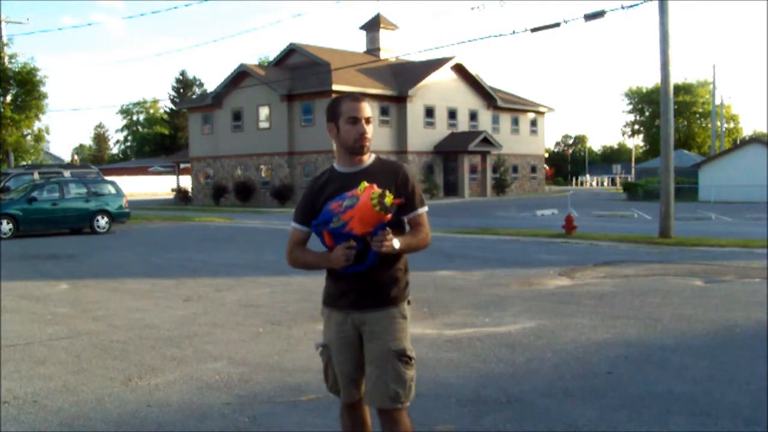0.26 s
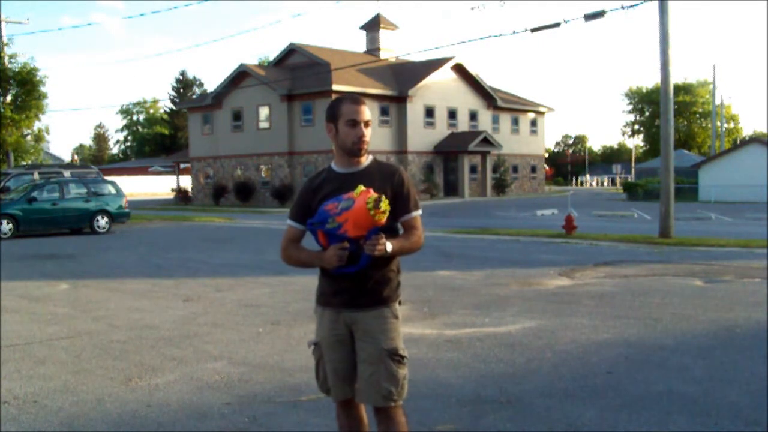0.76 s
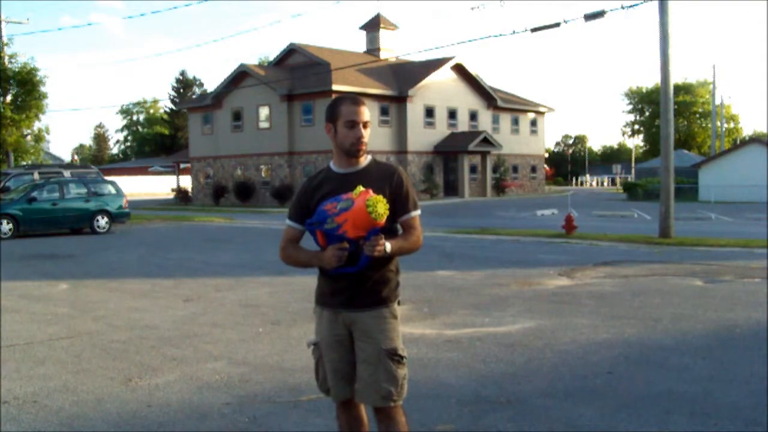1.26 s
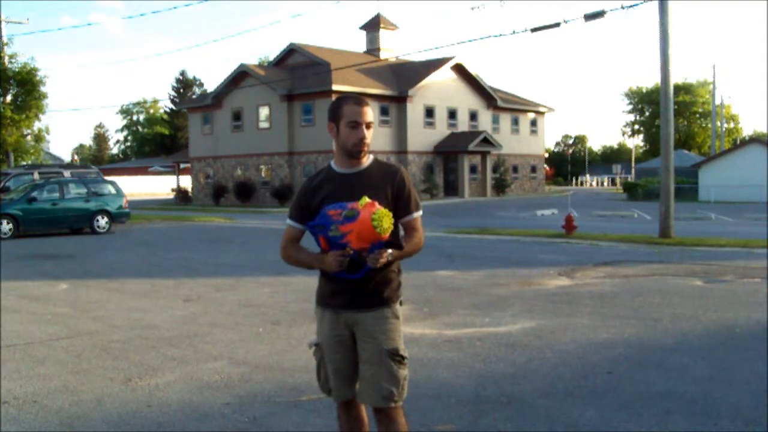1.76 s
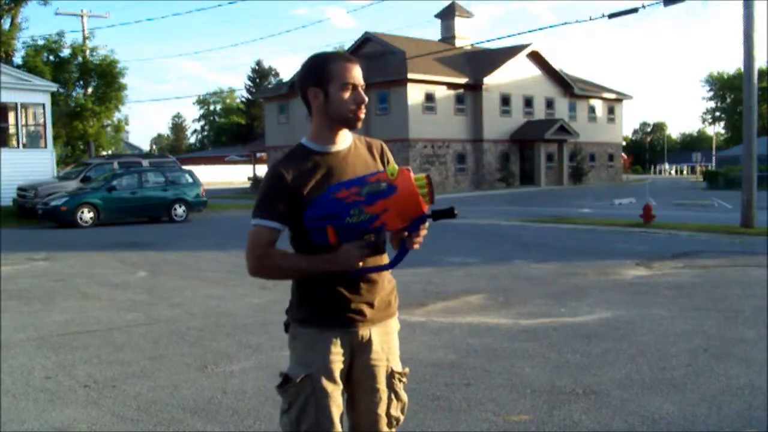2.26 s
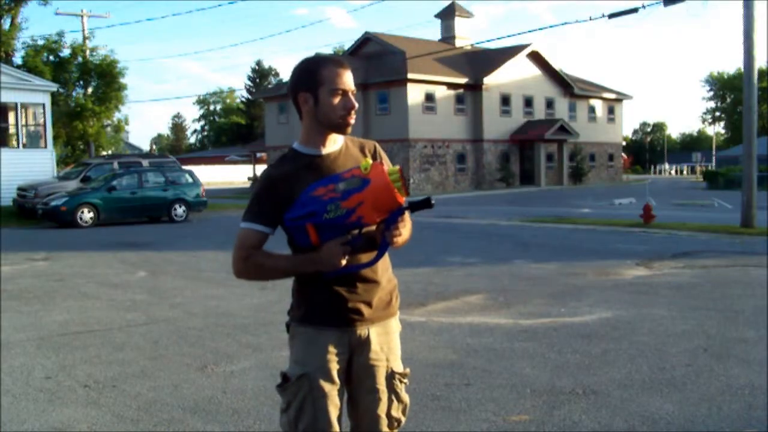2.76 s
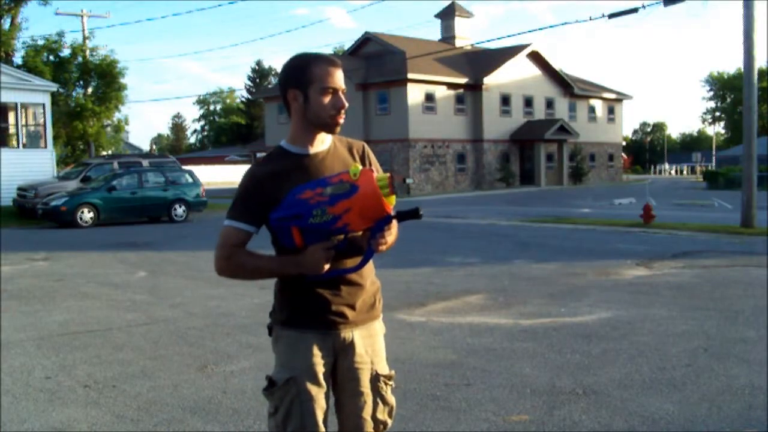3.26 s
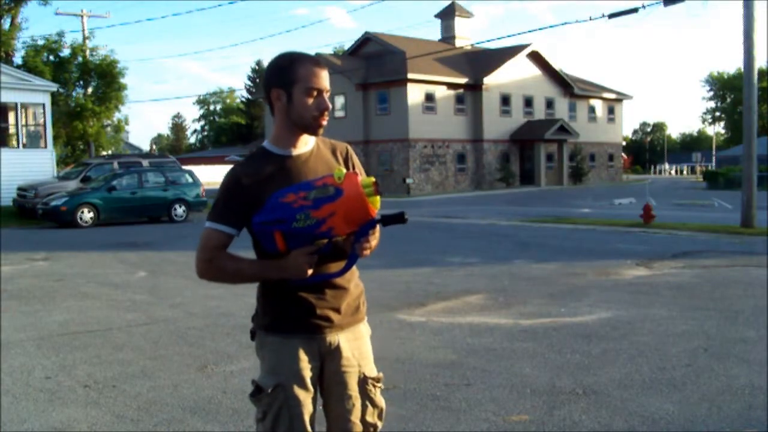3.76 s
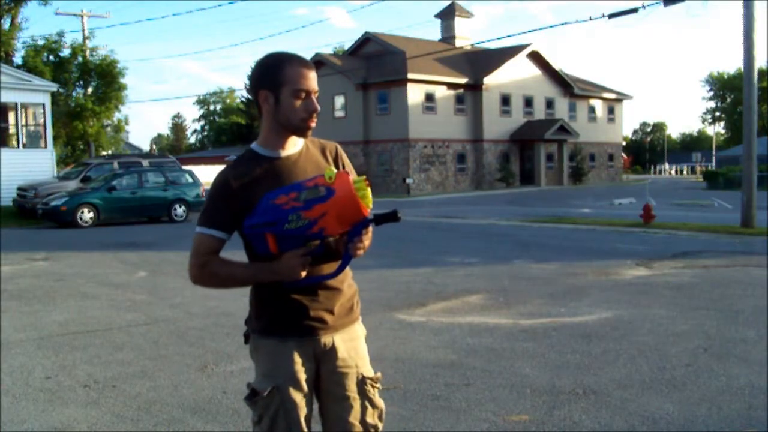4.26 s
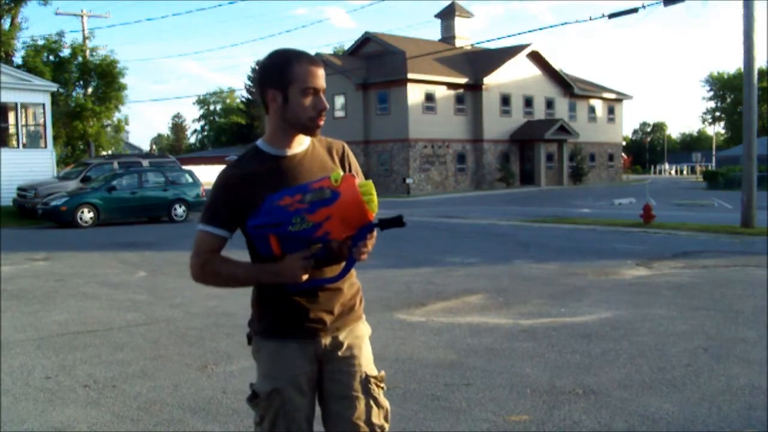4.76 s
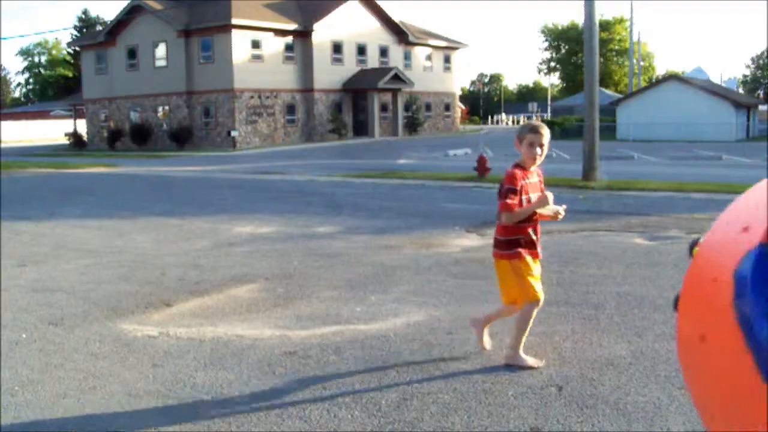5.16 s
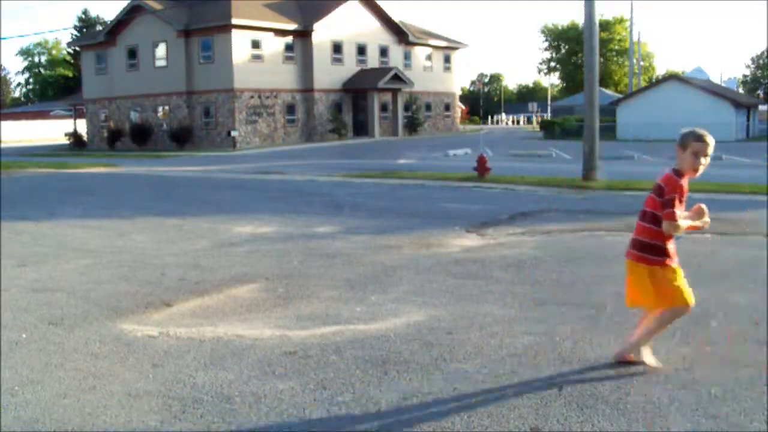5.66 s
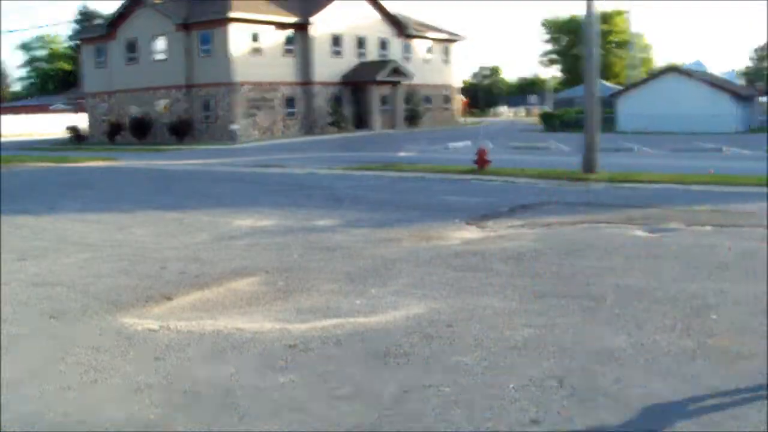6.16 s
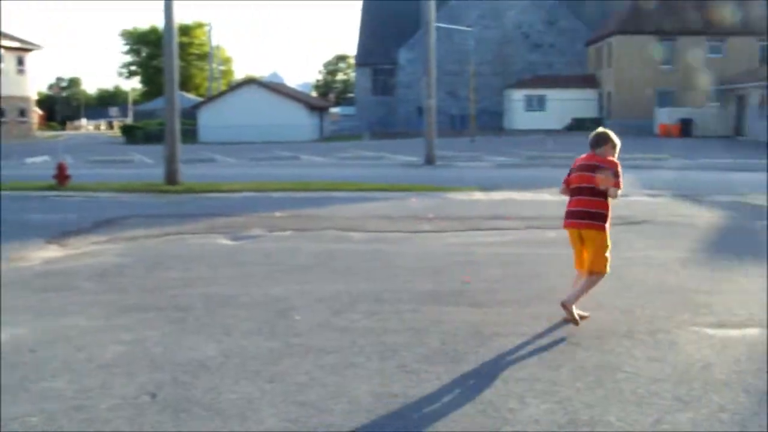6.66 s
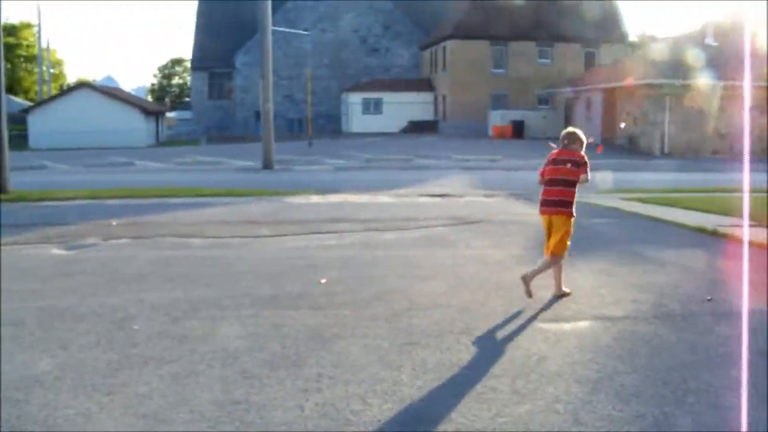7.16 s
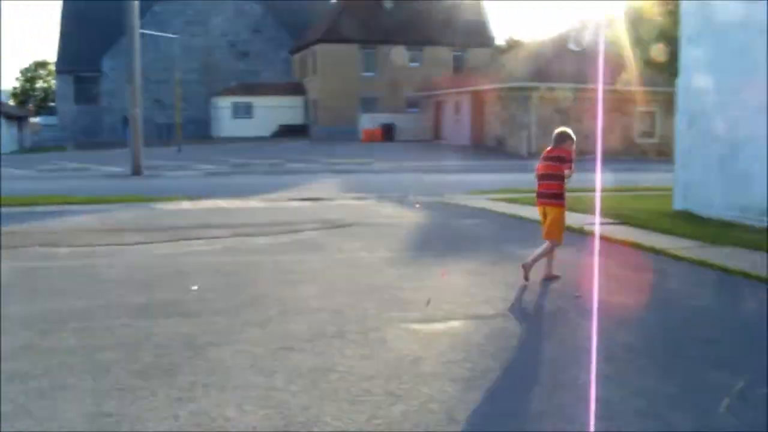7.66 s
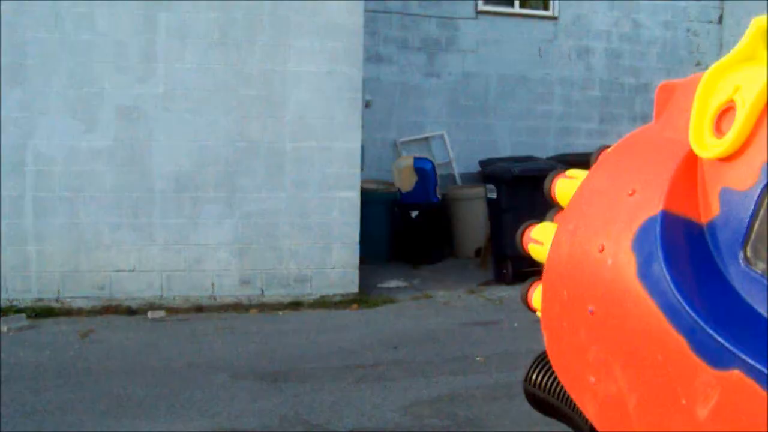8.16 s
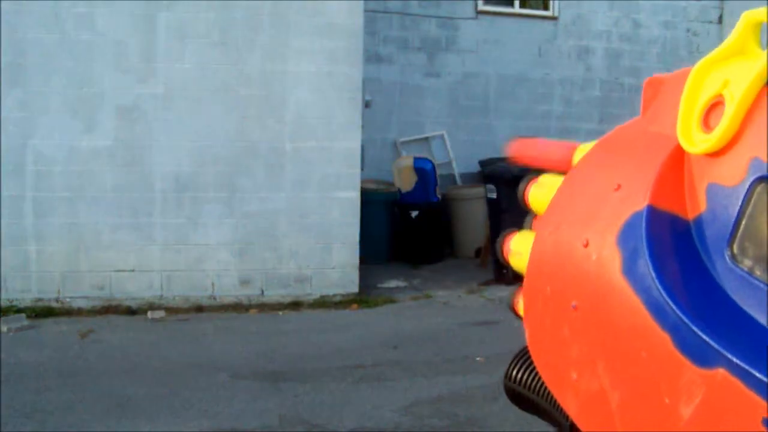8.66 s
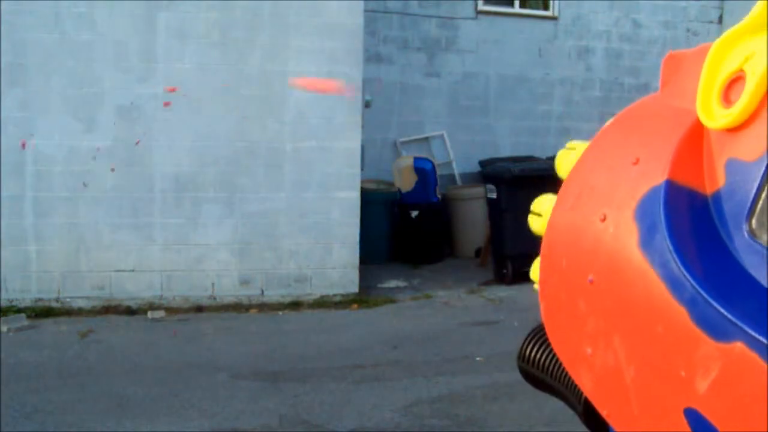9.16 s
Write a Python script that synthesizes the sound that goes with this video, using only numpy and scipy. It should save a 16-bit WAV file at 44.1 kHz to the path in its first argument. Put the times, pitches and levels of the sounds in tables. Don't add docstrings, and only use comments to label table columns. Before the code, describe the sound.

Fast puffing, clacking bursts from a plastic dart blaster, foam darts ticking and rolling on asphalt between them, wind thumping, the last bursts loud and distorted.

```python
import sys
import numpy as np
from scipy import signal
from scipy.fft import rfft, irfft
from scipy.io import wavfile
from scipy.ndimage import uniform_filter1d

SR = 44100
rng = np.random.default_rng(int(sys.argv[2]) if len(sys.argv) > 2 else 0)


def amplitude_ratio(level_db):
    exponent = np.asarray(level_db, float) / 20
    return 10 ** exponent


def output_pcm(signal):
    pcm = np.clip(np.atleast_2d(signal).T, -1, 1) * 32767
    wavfile.write(sys.argv[1], SR, np.round(pcm).astype(np.int16))


N = 414540
PORT_LAG = 8

TAKE_BORDERS = (0, 2.1, 5.07, 8.2035, 9.4)
# [pitch_hz, left_lead_rad]
FAR_LEAD = [(0, 0), (340, -0.3), (950, -0.2), (1210, 0.4), (1460, 0.2), (1810, 1.0), (2070, 0.6),
            (2760, 0.4), (3190, -0.2), (3700, -0.2), (4050, -0.1), (6460, -0.1), (7490, -0.0)]
# [pitch_hz, left_minus_right_db]
FAR_TILT = [(60, 4.5), (130, 4.5), (300, 0.5), (660, 0.5), (1470, 2), (3280, 4), (7300, -2)]


def evened(x):
    return x / np.sqrt(np.mean(x ** 2) + 1e-20)


def wander(count, smooth):
    return evened(uniform_filter1d(rng.standard_normal(count), size=smooth))


def read(points, hz):
    f, value = np.transpose(points)
    return np.interp(np.log(hz + 1), np.log(f + 1), value)


def add(mix, start_s, sound):
    part = mix[..., round(start_s * SR):][..., :sound.shape[-1]]
    part += sound[..., :part.shape[-1]]


def sides(pan_db):
    return amplitude_ratio(np.clip(pan_db, -12, 12) * np.array([[.5], [-.5]]))


def take_of(time_s):
    return np.searchsorted(TAKE_BORDERS, time_s, "right") - 1


def noise(spectrum, size, patchy_db, wide, long):
    hop = size // 4
    frames, hz = N // hop + 5, np.fft.rfftfreq(size, 1 / SR)
    a, b, c, d, patches = rng.standard_normal((frames, len(hz), 5)).T
    patches = uniform_filter1d(patches, wide, 0)
    patches = evened(uniform_filter1d(patches, long, 1))
    colour = amplitude_ratio(read(spectrum, hz)[:, None] + patchy_db * patches)
    z = np.array([a + 1j * b, c + 1j * d]) * colour
    return evened(signal.istft(z, nperseg=size, noverlap=size - hop)[1][:, :N])


def ring(x, hz, width):
    return signal.lfilter(*signal.iirpeak(hz, hz / width, SR), x)


def resonances(x, modes):
    return sum(amplitude_ratio(db) * ring(x, hz, width) for hz, width, db in modes)


def ports(pair, lead, tilt, likeness):
    hz = np.fft.rfftfreq(N, 1 / SR)
    a, b = rfft(pair)
    same = np.clip(read(likeness, hz), 0, 1)
    half = amplitude_ratio(read(tilt, hz) / 2)
    right = same * a * np.exp(-1j * read(lead, hz)) + np.sqrt(1 - same ** 2) * b
    return irfft([a * half, right / half], N)


def yard_level(take):
    traffic = (-41, -43.5, -43, -43.5)
    # [peak_s, peak_db, fade_db_per_s]
    rolls = [
        (1.43, -23.5, 45),
        (3.48, -23.5, 33),
        (4.2, -24, 31),
        (4.6, -22.5, 51),
        (6.15, -18.5, 54),
        (7.2, -23.5, 45),
        (7.31, -25.5, 46),
        (7.42, -49, 111),
        (8.0, -20.5, 38),
        (8.134, -29.5, 60),
    ]
    rise_db_per_s = 243.5
    t = np.arange(N) / SR
    power = amplitude_ratio(traffic)[take] ** 2
    for s, db, fade in rolls:
        roll_db = db - np.maximum(fade * (t - s), rise_db_per_s * (s - t))
        power += amplitude_ratio(roll_db) ** 2 * (take == take[round(s * SR)])
    return 10 * np.log10(power)


def yard():
    # [pitch_hz, level_db_per_hz]
    yard_colour = [(180, -71.5), (300, -5), (967, -4), (1060, -3.5), (1540, -4), (1830, -5), (2830, -12.5),
                   (3620, -9), (7750, -15), (10100, -57.5), (17000, -120)]
    # [pitch_hz, width_hz, level_db]
    foam = [(541, 50, 3.5), (710, 28, -3), (1406, 28, 1.5), (2620, 890, 8.5)]
    # [pitch_hz, likeness]
    yard_likeness = [(60, -8), (240, 3.5), (600, 0.5), (1500, 0.55), (3000, -1.5), (7000, 0.6)]
    yard_db = yard_level(take_of(np.arange(N) / SR))
    grains = amplitude_ratio(4.2 * np.minimum(rng.exponential(1, N), 4)) * (rng.random(N) < 170 / SR)
    grains = signal.oaconvolve(grains, np.exp(-np.arange(900) / 170))[:N]
    hiss = ports(noise(yard_colour, size=512, patchy_db=0, wide=8, long=6), FAR_LEAD, FAR_TILT, yard_likeness)
    busy = np.clip((yard_db + 46) / 16, 0, 1)
    traffic = signal.lfilter(*signal.butter(1, 1500, fs=SR), hiss) + amplitude_ratio(-9) * hiss
    rolling = amplitude_ratio(-1.5) * hiss + resonances(hiss, foam)
    sound = busy * rolling + (1 - busy) * traffic
    sound *= (1 + 0.5 * busy * grains) / (1 + 1.73 * busy)
    return sound * amplitude_ratio(yard_db + 3)


def wind():
    # [pitch_hz, level_db_per_hz]
    gust_colour = [(60, -59), (85, 6), (140, 2), (200, -4.5), (240, -4.5), (290, -43)]
    # [pitch_hz, level_db_per_hz]
    buffet_colour = [(12, -12.5), (30, 23), (50, 27.5), (75, 13), (100, -67)]
    # [time_s, level_db]
    strength = [(0, -50), (1.4, -50.5), (2.08, -47.5), (2.13, -41), (2.53, -38), (3.5, -35), (3.7, -41.5),
                (3.9, -34.5), (4.4, -37), (4.95, -42), (5.1, -35), (6.1, -31.5), (6.36, -32), (7.2, -33.5),
                (7.65, -34.5), (8.18, -32.5), (8.22, -43.5), (9.4, -48.5)]
    exposure = (-12, -16, -6.5, -3.5)
    t = np.arange(N) / SR
    gust_db = np.interp(t, *np.transpose(strength))
    buffet_db = gust_db + np.array(exposure)[take_of(t)]
    gust = noise(gust_colour, size=4096, patchy_db=2.5, wide=2, long=5)
    buffet = noise(buffet_colour, size=4096, patchy_db=0.5, wide=2, long=4)
    lumps = gust * amplitude_ratio(gust_db - 1.5) * amplitude_ratio([[1.5], [-1.5]])
    lumps += buffet * amplitude_ratio(buffet_db) * amplitude_ratio([[3.5], [-2.5]])
    return amplitude_ratio(2.5) * (lumps + 0.5 * lumps[::-1])


def taps(rows, width, tick_db, thud_db, rise_ms=.3, lag=PORT_LAG):
    out, ms = np.zeros((2, N)), np.arange(4000) * 1000 / SR
    onset, tick = np.minimum(ms / rise_ms, 1), np.exp(-ms / 1.5)
    bursts = rng.standard_normal((len(rows), 2, len(ms)))
    for (s, db, hz, t60_ms, pan_db), burst in zip(rows, bursts):
        burst[0, 14] = 3.5
        burst[1] = .75 * burst[0] + .66 * burst[1]
        sound = evened(ring(burst, hz, width * hz))
        sound += amplitude_ratio(tick_db) * np.diff(burst, prepend=0) * tick
        sound += amplitude_ratio(thud_db) * evened(ring(ring(burst, 800, 900), 800, 900))
        fade = amplitude_ratio(db - 5 - 60 * ms / max(t60_ms, 3))
        add(out, s - .001, fade * sound * sides(pan_db) * onset)
    return np.array([out[0], np.roll(out[1], lag)])


def snaps():
    # [start_s, peak_db, pitch_hz, t60_ms, left_minus_right_db]
    snap_rows = [(0.009, -21.5, 1500, 70, 13.5), (0.021, -4, 2310, 180, 2), (0.0308, 9, 5230, 36, 4),
                 (2.542, -15, 1850, 82, 0), (2.551, -6.5, 2570, 200, 12), (2.563, 11.5, 3370, 38, 0),
                 (3.92, -10, 1500, 120, -17), (3.931, 6.5, 2580, 40, 7.5), (4.368, -7, 2060, 52, 12),
                 (4.3797, 7.5, 2470, 44, 2), (5.534, -7.5, 2950, 24, 12.5), (5.597, -13.5, 2510, 55, 11),
                 (5.615, -19, 1120, 48, 7), (6.61, -26, 1500, 97, 11), (6.637, -25, 1140, 50, 19.5),
                 (6.922, -4, 1257, 85, 4), (7.046, -5, 1150, 75, -8), (7.634, -16.5, 2540, 82, 14.5),
                 (7.841, -3, 1280, 27, 3), (7.9, -4, 1500, 30, 8), (7.157, -6, 896, 27, 8),
                 (8.566, -9, 2960, 36, 12), (8.6066, -13.5, 2860, 60, 9)]
    far = [row for row in snap_rows if row[0] < TAKE_BORDERS[2]]
    near = [row for row in snap_rows if row[0] > TAKE_BORDERS[2]]
    sound = taps(far, width=1.0, tick_db=3, thud_db=-12.5, lag=0)
    return sound + taps(near, width=0.5, tick_db=1, thud_db=-2)


def strokes(shots, return_ms, first_db):
    s, db, open_ms = np.transpose(shots)
    first = np.diff(s, prepend=-1) > .15
    back_db = -6 + 2.5 * rng.standard_normal(len(s)) + first * first_db
    return np.transpose([s, db, open_ms, return_ms + 0 * s, back_db])


def blaster(shots, jet, housing, rise_ms, fall_ms, leak_db, body_db, knock_db, linger_ms):
    flow, knocks, ms = np.zeros(N), np.zeros(N), np.arange(8000) * 1000 / SR
    opening = (1 - np.exp(-ms / rise_ms)) ** 2
    crack = np.minimum(ms / 5, 1) ** 2 * np.exp(-ms / 25)
    landing = np.exp(-ms / 4.3)
    indexing = np.exp(-ms / 1.27)
    for s, db, open_ms, back_ms, back_db in shots:
        after = np.maximum(ms - open_ms, 0)
        closing = np.exp(-after / fall_ms) + amplitude_ratio(leak_db) * np.exp(-after / 32)
        add(flow, s - .002, amplitude_ratio(db) * opening * closing)
        add(knocks, s + back_ms / 1000, amplitude_ratio(db + back_db) * landing)
        add(knocks, s + (back_ms - 8) / 1000, amplitude_ratio(db + back_db + 8) * indexing)
        add(flow, max(s - .006, 0), amplitude_ratio(db - 15.5) * crack)
    flutter = amplitude_ratio(2.2 * wander(N, 70))
    air = noise(jet, size=512, patchy_db=2.5, wide=6, long=3) * flow * flutter
    keep = np.exp(-1000 / SR / linger_ms)
    swirl = np.maximum(flow, signal.lfilter([1 - keep], [1, -keep], flow))
    drive = rng.standard_normal((2, N)) * (amplitude_ratio(body_db) * swirl + amplitude_ratio(knock_db) * knocks)
    puff = amplitude_ratio(-34.5) * knocks * noise(jet, size=512, patchy_db=-10, wide=6, long=2)
    return air * (1 + knocks * amplitude_ratio(-41)) + puff + resonances(drive, housing)


def far_blaster():
    # [start_s, level_db, valve_open_ms]
    shots = [(0.0625, -2, 20), (0.114, -5, 27.5), (0.1695, -3, 23), (0.2218, -2, 17.2), (0.2758, -2.5, 23),
             (0.3307, -3, 26), (0.3892, -4, 23), (0.4463, -0.5, 16), (0.5052, -3.5, 26), (0.5638, -2.5, 23),
             (0.6243, -4, 29), (0.6901, -2, 20), (0.7517, -3.7, 25), (0.8139, -2.5, 24), (0.8804, -2.5, 23),
             (0.9493, -3, 23), (1.0189, -2.5, 22), (1.0844, -2, 19.7), (1.1574, -1, 19.6),
             (1.231, -4, 28.6), (1.3028, -2, 21), (2.596, -1.5, 19), (2.646, -3.5, 20), (2.6982, -2.5, 19),
             (2.7498, -2.5, 21), (2.8049, -2.5, 22), (2.8565, -2, 14), (2.912, -3, 18), (2.9663, -0.5, 20),
             (3.0237, -2, 25), (3.0824, -5.5, 29), (3.141, -3, 22), (3.2025, -2, 22), (3.2619, 0, 12),
             (3.3238, -2, 19), (3.3903, -2.5, 23), (3.9779, -2, 21), (4.0416, -3.5, 22), (4.11, -1, 20.4),
             (4.4302, -2.5, 22), (4.504, -0.5, 18)]
    # [pitch_hz, level_db_per_hz]
    jet = [(59, -82.5), (100, -50.5), (293, -43.5), (371, -10.5), (585, -7), (652, -30), (857, -8.5),
           (973, -8.5), (1430, -6.5), (2130, -5.5), (2510, -1.5), (6700, -8.5), (7750, -9.5), (10100, -13),
           (17000, -120)]
    # [pitch_hz, width_hz, level_db]
    housing = [(398.6, 30, 1), (660, 22, -5), (786, 540, 1), (1437, 130, 0.5), (1600, 390, 1),
               (2403, 130, 3), (3686, 120, -3.5)]
    # [pitch_hz, likeness_0_to_1]
    likeness = [(60, 0), (300, .95), (900, .8), (1500, .4), (3000, .6), (4100, .97), (7500, .93)]
    pair = blaster(strokes(shots, return_ms=42, first_db=2), jet, housing, rise_ms=0.99, fall_ms=7.9,
                   leak_db=-16, body_db=0, knock_db=2, linger_ms=4)
    return amplitude_ratio(2.94) * ports(pair, FAR_LEAD, FAR_TILT, likeness)


def near_blaster():
    # [start_s, level_db, valve_open_ms]
    shots = [(5.6597, -1.5, 22), (5.7022, 1, 25), (5.7525, 0, 20), (5.8024, -1, 26), (5.8533, 0, 35),
             (5.9069, -2, 30), (5.9611, 0.5, 24), (6.0162, -1.5, 20), (6.6575, -2, 22), (6.7055, 0, 32),
             (6.7618, -0.5, 32), (6.818, -3, 40), (6.877, -0.5, 25), (6.9366, 1, 31), (6.9955, -0.5, 30),
             (7.0569, 1, 24), (7.1212, -2.5, 28), (7.6685, -2, 19), (7.7231, 0, 30), (7.7891, -2, 30),
             (7.8549, 0, 29), (7.9274, 0.5, 23.2), (8.6425, 0.5, 20), (8.6854, -2, 31), (8.734, 1.5, 22),
             (8.7854, 0.5, 33), (8.8369, -2.5, 34), (8.8797, -2, 16), (8.8997, -0.5, 20), (8.9526, 0, 32),
             (9.003, -2.5, 66), (9.0646, -2.5, 39), (9.1178, -0.5, 41), (9.1812, -1.5, 34),
             (9.2385, 2.5, 36), (9.3015, -1, 34), (9.3597, 0, 28)]
    # [pitch_hz, level_db_per_hz]
    jet = [(59, -57.5), (100, -15), (227, -27), (293, -3), (351, -4), (585, -1), (676, 0), (955, 0.5),
           (1260, 5), (1950, 3), (4920, -1.5), (6820, -3.5), (7750, -4), (10100, -43.5), (17000, -120)]
    # [pitch_hz, width_hz, level_db]
    housing = [(239, 60, -3), (363, 39, -5.5), (523.5, 30, 0), (683, 78, 2.5), (760, 35, -8.5),
               (1232, 390, -4.5), (1500, 79, 1), (2705, 380, 1)]
    # [pitch_hz, left_minus_right_db]
    tilt = [(60, 17.5), (130, 6.5), (300, -3), (800, -4.5), (1900, 0), (2850, 5.5), (3900, 1.5),
            (7300, 0.5)]
    # [pitch_hz, left_lead_rad]
    third_lead = [(0, 0), (690, 0.6), (1380, 1.9), (1980, 2.1), (2240, 2.5), (2840, 2.8), (3530, 3.0),
                  (3880, 3.2), (4570, 5.3), (5170, 5.0), (5510, 5.8), (6370, 6.1), (6890, 5.8), (7490, 6.4)]
    last_lead = [(0, 0), (690, 0.5), (1290, 1.5), (2070, 2.3), (2410, 1.5), (2670, 3.0), (3270, 4.5),
                 (3620, 2.3), (3880, -0.1), (7490, 0.0)]
    # [pitch_hz, likeness_0_to_1]
    third_likeness = [(60, 0), (300, .8), (2700, .85), (3800, .45), (7500, .5)]
    last_likeness = [(60, 0), (600, .9), (1500, .6), (2400, .45), (3200, .1), (4200, .8), (7500, .75)]
    pair = blaster(strokes(shots, return_ms=38, first_db=3), jet, housing, rise_ms=3, fall_ms=4.5,
                   leak_db=-10, body_db=2.5, knock_db=13, linger_ms=9.2)
    last_take = np.arange(N) >= TAKE_BORDERS[-2] * SR
    last = ports(pair, last_lead, tilt, last_likeness)
    third = ports(pair, third_lead, tilt, third_likeness)
    near = amplitude_ratio(0.5) * np.where(last_take, last, third)
    near[:, :round(TAKE_BORDERS[2] * SR)] = 0
    near += last_take * (amplitude_ratio(-7) * ring(near, 690, 130) - amplitude_ratio(-9) * ring(near, 1500, 700))
    echo_ms, echo_db = 22, -9.5 + np.array([[-6], [0]])
    near += last_take * amplitude_ratio(echo_db) * np.roll(near[::-1], round(echo_ms * SR / 1000), axis=1)
    return near


def walls(x):
    # [pitch_hz, t60_s]
    decay = [(300, 0.38), (1500, 0.27), (7000, 0.17)]
    tail = np.zeros((2, SR))
    at = np.arange(900, SR - 20, 20) + rng.integers(0, 20, (2, (SR - 901) // 20))
    np.put_along_axis(tail, at, rng.choice([-1., 1.], at.shape), 1)
    hz, t, z = signal.stft(tail, SR, nperseg=256)
    tail = signal.istft(z * amplitude_ratio(-60 * t / read(decay, hz)[:, None]), SR, nperseg=256)[1]
    tail = tail / np.linalg.norm(tail[0])
    takes = np.split(x, [round(s * SR) for s in TAKE_BORDERS[1:-1]], axis=1)
    return np.hstack([signal.fftconvolve(take, tail, axes=1)[:, :take.shape[1]] for take in takes])


def landings():
    # [start_s, peak_db, pitch_hz]
    far_darts = [(1.411, -16, 4000), (1.5237, -18, 2500), (1.5836, -14, 2500), (1.6032, -2, 3500),
                 (1.638, -17, 5030), (1.644, -20, 2000), (1.7043, -26, 3000), (1.7135, -30, 5000),
                 (1.7437, -20, 5010), (1.8196, -27, 3000), (1.836, -22, 3000), (1.846, -21, 3500),
                 (1.8517, -25, 3600), (1.938, -33, 4000), (1.945, -35, 4000), (1.984, -28, 4470),
                 (2.0066, -29, 1120), (2.012, -32, 1500), (2.064, -29, 3500), (3.5054, -15, 4300),
                 (3.5245, -12, 4800), (3.6247, -15, 3000), (3.662, -10, 3100), (3.7274, -12, 3000),
                 (3.795, -28, 2540), (3.8372, -11, 2720), (3.8586, -12, 3000), (4.641, -19, 2440),
                 (4.7447, -25, 2440), (4.791, -18, 3250), (4.8115, -22, 3330), (4.8335, -18, 2600)]
    far_pan = (4.5, 12)
    # [start_s, peak_db, pitch_hz, left_minus_right_db]
    near_darts = [(6.101, -5.5, 5000, -15), (6.1735, -12, 3000, 5), (6.209, -14, 5000, 8),
                  (6.2362, -14, 2500, 5), (6.2671, -10, 2600, 1), (6.2971, -14, 4000, 7),
                  (6.313, -19, 6000, 8), (6.347, -16, 3090, 6), (6.4058, -16, 2750, 7),
                  (6.4657, -17, 3640, 7), (6.5221, -16, 3280, 8), (6.5415, -21, 3100, 10),
                  (6.5724, -9, 3000, 7), (6.591, -24, 3000, 4), (7.3382, -11, 2500, 6),
                  (7.4146, -12, 5500, 3), (7.434, -23, 1750, 2), (7.5248, -18, 5000, 5),
                  (7.5726, -18, 3960, 5), (7.62, -22, 2500, 11)]
    rows = [(*row, far_pan[int(row[0] > TAKE_BORDERS[1])]) for row in far_darts] + near_darts
    out, ms = np.zeros((2, N)), np.arange(900) * 1000 / SR
    bursts = rng.standard_normal((len(rows), 2, len(ms)))
    for (s, db, hz, pan_db), burst in zip(rows, bursts):
        tail_ms = np.clip(1.6 + .3 * burst[0, 0], .8, 2.6)
        hit = amplitude_ratio(-19) * (burst[0] + .5 * burst) * np.exp(-ms / 2.5)
        hit[:, 0] = 1
        hit[:, round(tail_ms * SR / 1000)] += amplitude_ratio(-2 + 2 * burst[1, 0])
        sound = ring(hit, 2300, 5500) + amplitude_ratio(12) * ring(hit, hz, .3 * hz)
        sound *= sides(pan_db)
        sound += amplitude_ratio(12) * ring(hit, 1000, 900)
        sound[1] = np.roll(sound[1], PORT_LAG)
        add(out, s, amplitude_ratio(db + 5.5) * sound / abs(sound.mean(0)).max())
    return out


def scuffs():
    # [start_s, peak_db, pitch_hz, t60_ms, left_minus_right_db]
    scuff_rows = [(1.443, -17, 2060, 36, 4), (1.4843, -7, 1190, 53, 0.5), (1.617, -9.5, 5500, 38, 2),
                  (2.028, -22, 1050, 56, 7), (3.531, -5, 3000, 38, 0), (3.573, -5, 2840, 45, 8),
                  (4.2484, -12, 1810, 59, 7), (4.292, -8, 5500, 36, -5.5), (4.684, -10, 1560, 41, 6),
                  (5.087, -10, 2650, 21, 17), (5.445, -23.5, 1500, 57, 8), (5.459, -25, 6500, 57, 8),
                  (6.105, -7, 3050, 73, -4), (6.144, -13, 1480, 60, 2), (6.1604, -4.5, 4500, 44, -6),
                  (6.595, -12, 1440, 43, 3), (7.202, -7, 4000, 66, -2), (7.2375, -18, 1460, 56, -1),
                  (7.2664, -3.5, 4500, 63, 2.5), (7.2963, -11.5, 1330, 44, 2), (7.33, -11.5, 1310, 75, 14),
                  (7.392, -12.5, 1500, 95, 12), (7.4575, -12, 2800, 35, 5), (8.0716, -13, 3000, 100, 1),
                  (8.097, -8, 3500, 37, 13), (8.105, -16, 4000, 86, 0), (8.13, -12, 2140, 56, 13),
                  (8.167, -21, 3000, 50, 4), (8.193, -10, 1990, 35, 5), (5.09, -21, 1400, 46, 8)]
    return taps(scuff_rows, width=0.38, tick_db=-9, thud_db=-11, rise_ms=2.4)


def moans():
    # [start_s, length_s, pitch_hz, level_db]
    moan_rows = [(2.16, 0.24, 144, -40.5), (3.47, 0.47, 109.3, -41.5), (4.68, 0.31, 137.2, -37),
                 (4.731, 0.22, 94, -38), (5.052, 0.34, 98.5, -43), (5.053, 0.11, 50, -32.5),
                 (5.4, 0.19, 174.6, -42.5), (6.33, 0.19, 198, -34.5), (6.345, 0.36, 50, -50),
                 (7.247, 0.36, 49, -32), (7.4, 0.27, 162.4, -35), (8.071, 0.15, 188, -36.5),
                 (8.077, .13, 44.6, -36)]
    out = np.zeros((2, N))
    for s, length, hz, db in moan_rows:
        size = round(length * SR)
        drift, swell = wander(SR, 1500)[:size], wander(SR, 1500)[:size]
        tone = np.sqrt(2) * np.sin(2 * np.pi * np.cumsum(hz * (1 + 0.03 * drift)) / SR)
        level = amplitude_ratio(db + 4.5 + 1.3 * swell + np.array([[1.8], [-1.8]]))
        add(out, s, level * tone * signal.windows.tukey(size, .4))
    return out


def bird():
    # [start_s, length_s, start_hz, middle_hz, end_hz, level_db]
    chirp_rows = [
        (5.418, 0.042, 3840, 5040, 4170, -39),
        (5.467, 0.06, 4000, 4830, 5500, -48),
    ]
    out = np.zeros((2, N))
    for s, length, start_hz, mid_hz, end_hz, db in chirp_rows:
        u = np.linspace(0, 1, round(length * SR))
        hz = np.interp(u, [0, .3, 1], [start_hz, mid_hz, end_hz])
        hz = hz * (1 + .05 * wander(len(u), 60))
        whistle = np.sin(2 * np.pi * np.cumsum(hz) / SR) * np.sin(np.pi * u)
        add(out, s, amplitude_ratio(db + np.array([[3], [-3]])) * whistle)
    return out


def choke():
    # [start_s, length_ms, depth_db]
    dropouts = [(5.7188, 31.2, -34), (5.8458, 4.7, -13), (5.8759, 6.9, -16), (5.9459, 11.6, -14),
                (5.9953, 18.8, -26), (6.0339, 18.0, -38), (6.0668, 33.7, -30), (6.1021, 35.8, -38),
                (6.7231, 36.5, -46), (6.8021, 16.6, -23), (6.8434, 9.0, -39), (6.8645, 12.5, -27),
                (6.8939, 26.7, -39), (6.9627, 33.3, -43), (7.0092, 33.7, -36), (7.0503, 5.4, -10),
                (7.0962, 18.3, -15), (7.1427, 11.5, -17), (7.1608, 134.0, -58), (7.7411, 47.6, -44),
                (7.8052, 35.8, -41), (7.8467, 8.5, -23), (7.8702, 28.8, -38), (7.9051, 22.6, -25),
                (7.9537, 139.2, -60), (8.7048, 25.6, -28), (8.7783, 4.7, -10), (8.8673, 6.8, -13),
                (9.0998, 9.4, -13), (9.1107, 5.6, -24)]
    db = np.zeros(N)
    for s, length_ms, depth_db in dropouts:
        ms = np.arange(0, length_ms, 1000 / SR)
        floor_db = 1.2 * depth_db if depth_db > -29 else -120
        add(db, s, np.maximum(-17 - 1.3 * ms, floor_db))
    return uniform_filter1d(amplitude_ratio(db), size=30)


def scene():
    far, near = far_blaster(), near_blaster()
    hits = snaps() + landings() + scuffs()
    echoes = amplitude_ratio(-16) * walls(far + amplitude_ratio(1) * near + hits)
    background = yard() + wind() + moans() + bird()
    return far + near + hits + echoes + background


def low_pass(x):
    return signal.sosfilt(signal.butter(12, 15700, fs=SR, output="sos"), x)


def record(dry):
    x = dry
    # [pitch_hz, width_hz]
    shell_dips = [(295, 61), (975, 128)]
    for hz, width in shell_dips:
        x = x - 1.18 * ring(x, hz, width)
    x = 1.425 * np.tanh(x / 2.386)
    x = x * np.array([choke(), np.ones(N)])
    x = signal.oaconvolve(x, signal.firwin(161, 7500, window=("kaiser", 8), fs=SR)[None], "same")
    knee, room = .62, .47
    over = np.maximum(abs(x) - knee, 0)
    x = np.sign(x) * (abs(x) - over + room * np.tanh(over / room))
    x = signal.oaconvolve(x, signal.firwin(255, 15600, window=("kaiser", 8), fs=SR)[None], "same")
    return low_pass(x)


dry = scene()
out = record(dry)
output_pcm(out)
```